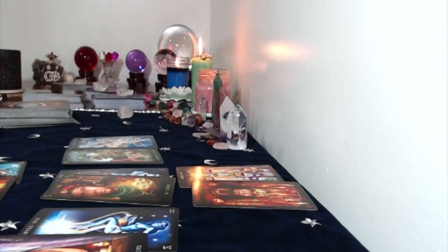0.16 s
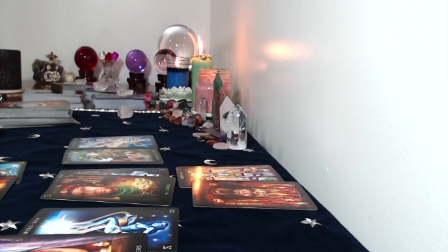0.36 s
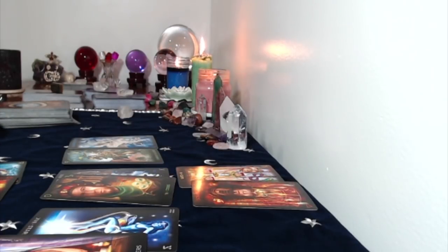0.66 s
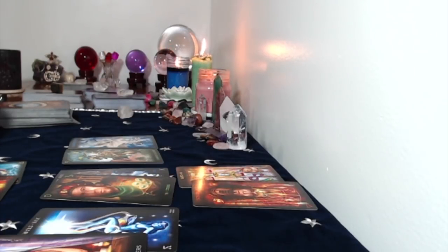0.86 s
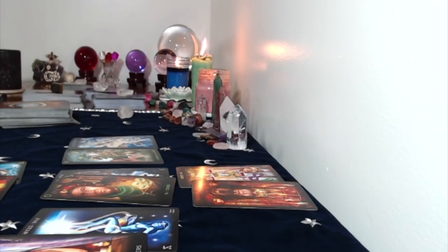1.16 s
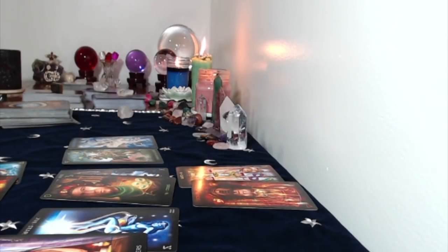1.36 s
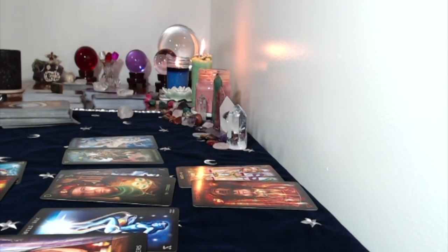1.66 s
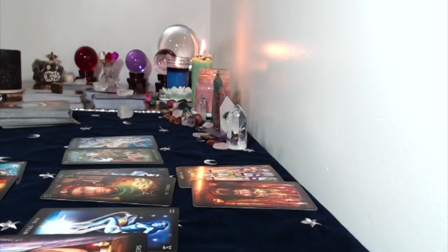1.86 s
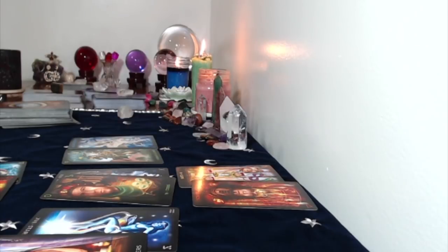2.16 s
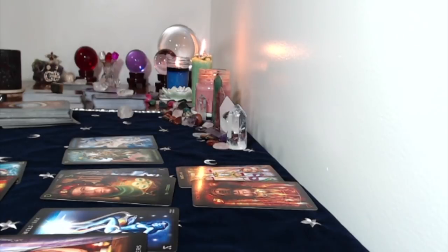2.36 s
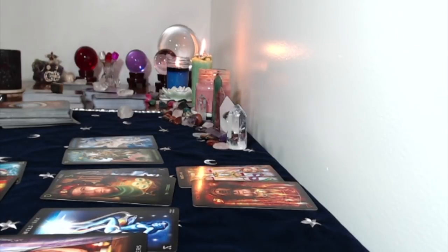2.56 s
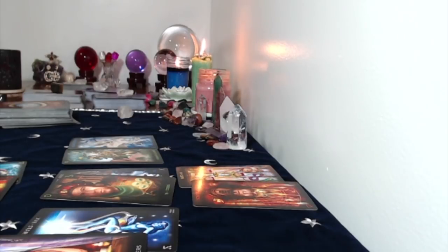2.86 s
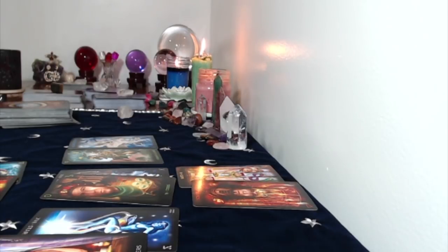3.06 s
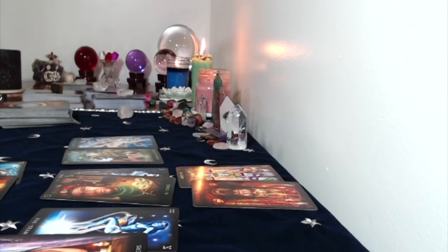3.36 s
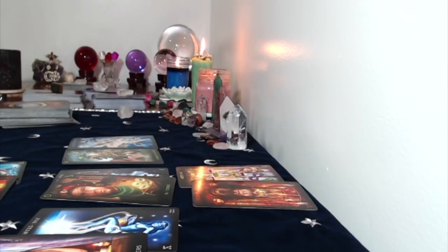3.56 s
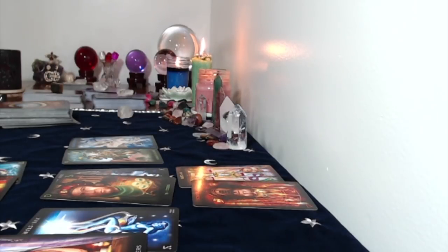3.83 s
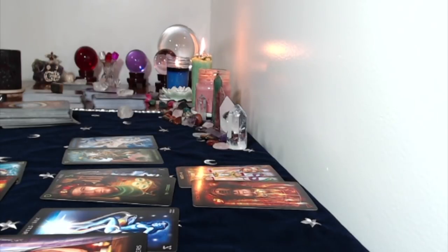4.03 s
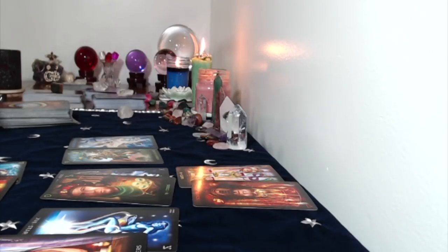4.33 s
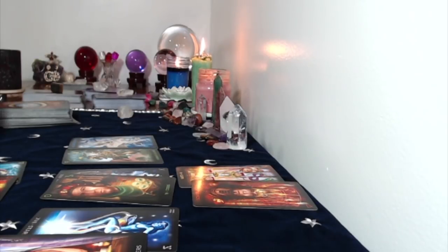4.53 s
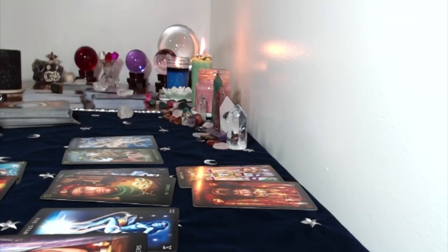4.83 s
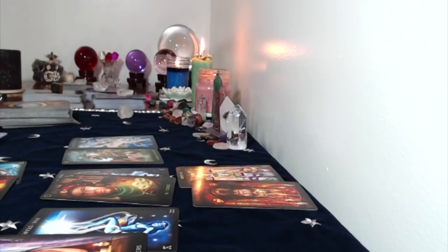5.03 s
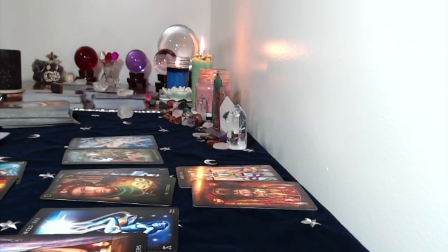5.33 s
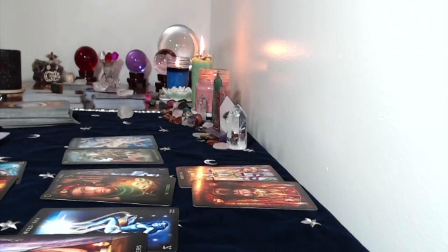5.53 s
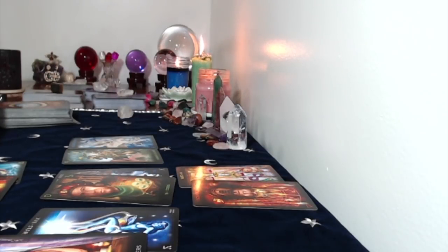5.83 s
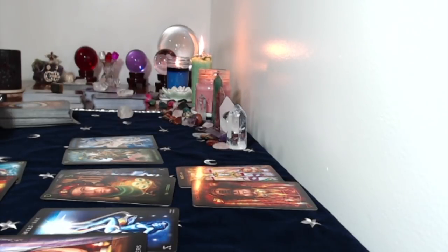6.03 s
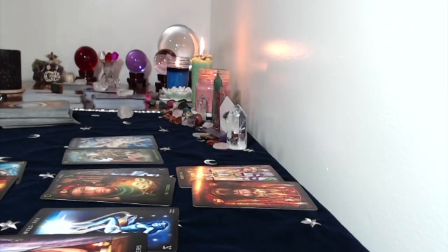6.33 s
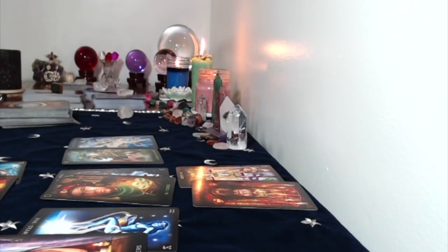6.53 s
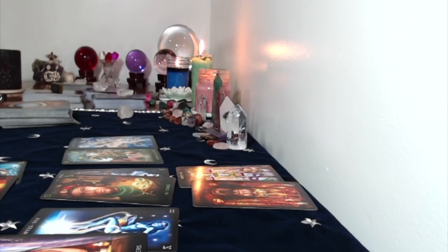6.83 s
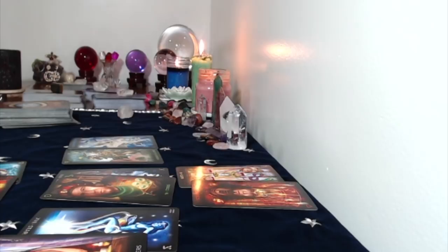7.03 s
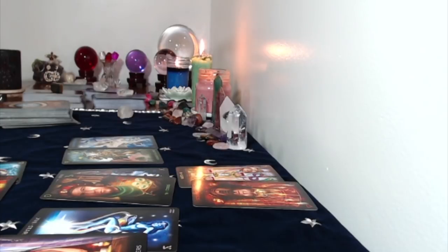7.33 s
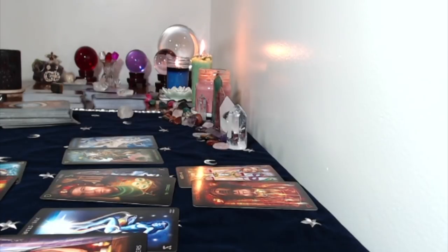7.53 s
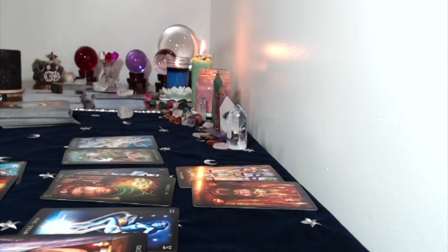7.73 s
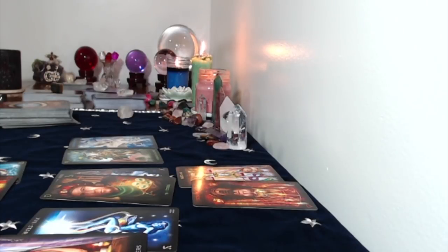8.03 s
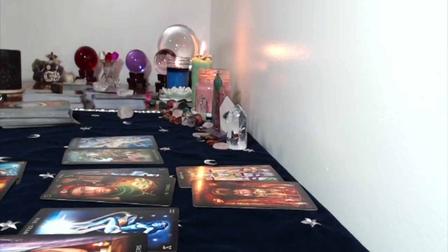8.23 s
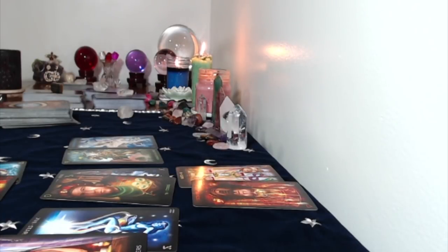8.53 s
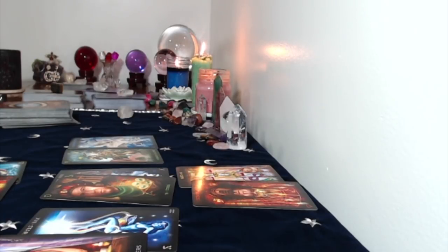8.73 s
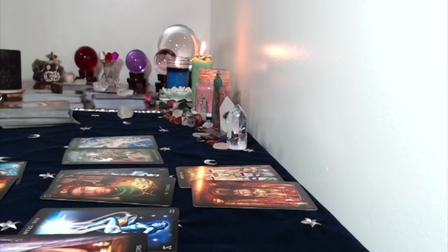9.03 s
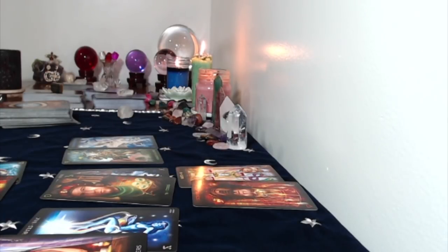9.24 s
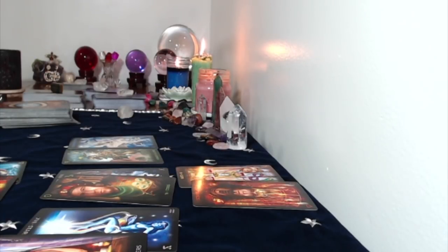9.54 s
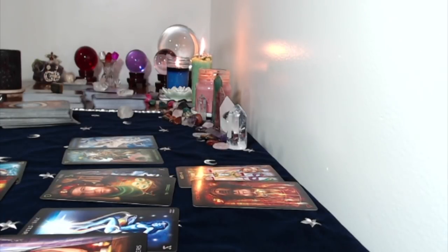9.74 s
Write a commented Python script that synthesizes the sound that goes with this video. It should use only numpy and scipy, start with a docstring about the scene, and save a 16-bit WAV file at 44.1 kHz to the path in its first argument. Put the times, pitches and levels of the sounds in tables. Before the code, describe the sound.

Four hollow knocks of a card deck on a table, with packets sliding and slapping and edges snapping over a faint hum.

```python
"""A deck of large cards is knocked square four times on a cloth-covered table in a small room.
In each knock a corner touches first, then the packets (small stacks of cards) land; table and room boom.
The hardest knock makes glass ornaments on the table ring faintly. Around the knocks, packets slide and
slap, card edges snap and hands bump the cloth. Mains hum and faint hiss lie under everything."""
import sys
import numpy as np
from scipy import signal
from scipy.fft import rfft, irfft
from scipy.io import wavfile

SR = 44100
rng = np.random.default_rng(int(sys.argv[2]) if len(sys.argv) > 2 else 0)


def bounce(signal):
    """Save signal as a 16-bit WAV file at the path given by the first command-line argument."""
    frames = np.transpose(np.atleast_2d(signal))
    limited = np.clip(frames, -1, 1)
    pcm = np.round(limited * 32767).astype(np.int16)
    wavfile.write(sys.argv[1], SR, pcm)


N = 436149
T = np.arange(N) / SR
FFT_SIZE = 4096
FREQS = np.maximum(np.arange(FFT_SIZE // 2 + 1) * SR / FFT_SIZE, 1)

# Levels compare rows within a table. A fade_s is the time a sound takes to drop by 60 dB.
# How long the room echoes: pitch_hz, fade_s
ROOM_FADES = [(100, 0.44), (500, 0.34), (1500, 0.35), (5000, 0.33), (9000, 0.37), (15000, 0.37)]
# Tone colour (how strong each pitch is) of the hiss and rumble: pitch_hz, level_db
AIR_COLOUR = [(20, -3.5), (40, -6.5), (90, -16.5), (170, -16.5), (350, -23), (415, -20), (450, -9),
              (510, -20.5), (650, -28), (1400, -25.5), (2200, -34), (5800, -33), (8500, -41.5),
              (15500, -45)]
# Two tones of mains hum and a faint whine: pitch_hz, level_db
HUM_TONES = [(59.6, -57), (119.5, -66.5), (3010, -85)]
# Packets drawn over each other: fastest_moment_s, length_s, level_db, brightness_db_per_octave
SLIDES = [(0.443, .18, -53.5, -0.5), (0.694, 0.092, -55.5, -2), (0.789, 0.066, -56.5, -2),
          (0.97, .1, -45.5, 3), (1.276, 0.2, -62, 2.5), (1.542, 0.44, -58, -3), (2.129, 0.52, -62, 1),
          (2.541, 0.057, -62.5, 4.5), (2.713, 0.12, -66.5, -3.5), (3.038, 0.18, -57, 1),
          (3.246, 0.24, -66, -6), (3.482, 0.26, -62.5, -1), (4.479, 0.084, -54, -3.5),
          (4.551, 0.078, -38, -0.5), (4.642, 0.18, -40, -1.5), (4.822, 0.17, -33.5, -3.5),
          (4.93, 0.15, -41.5, 6.5), (5.016, 0.12, -32, -2.5), (5.748, 0.34, -57.5, -2.5),
          (6.164, 0.11, -47.5, 1.5), (6.443, 1, -64, 1.5), (7.086, 0.18, -61.5, 0), (7.278, 0.21, -67.5, 0),
          (8.06, 0.32, -60.5, 0.5), (8.446, .19, -51, 3), (9.028, 0.52, -55.5, -2),
          (9.359, 0.23, -45, -2.5), (9.705, 0.83, -62.5, -5.5)]
# Tone colour of rubbing cards: pitch_hz, level_db
SLIDE_COLOUR = [(80, -5), (300, -3), (650, -7.5), (900, 0.5), (1150, -9.5), (1600, -1), (2400, -6),
                (3300, -8), (4700, -1.5), (6000, -0.5), (8000, -10), (11000, -18), (15500, -30.5)]
# Edges snapping and packets slapping: start_s, level_db, brightness_db_per_octave, length_s, pitch_hz
SNAPS = [(0.24, -53.5, -3.5, 0.02, 5300), (0.358, -45, -4, 0.018, 1400), (0.558, -51.5, 0.5, 0.0028, 8800),
         (0.633, -53, -3.5, 0.01, 1590), (0.908, -45.5, -2, .007, 1650), (1.826, -50.5, -2, 0.0016, 1690),
         (2.389, -41.5, -4, 0.025, 2620), (2.842, -57, -5.5, 0.0063, 4460),
         (3.397, -52.5, -6, 0.0081, 5460), (3.449, -52.5, 0, .007, 2200), (4.004, -14, -7, 0.0029, 1440),
         (4.489, -33.5, -4.5, 0.011, 5140), (4.497, -30, 1.5, 0.0079, 1430), (4.513, -25, -1, 0.0047, 6040),
         (4.729, -34.5, -6, .002, 5500), (4.771, -20, -6, 0.0058, 990), (4.778, -20.5, -0.5, 0.0033, 900),
         (4.803, -25, 3.5, .013, 1290), (4.869, -21.5, 0, .0015, 1260), (4.964, -26.5, 2.5, 0.0035, 5400),
         (5.033, -14.5, 2, 0.009, 990), (5.038, -16.5, -2.5, 0.0046, 4770), (5.046, -18.5, 2.5, .004, 6800),
         (5.505, -50, -1.5, 0.00087, 4600), (5.535, -42.5, -1.5, 0.01, 4200),
         (5.669, -49.5, -3.5, 0.0058, 2800), (5.759, -42.5, -.5, 0.0003, 5870),
         (5.977, -40.5, -1.5, 0.0054, 1890), (5.985, -35.5, -.5, .004, 1250),
         (6.107, -46, -1.5, 0.016, 3020), (6.528, -20.5, -10.5, 0.007, 3620),
         (6.874, -44.5, -5, .004, 2415), (6.883, -44.5, 3.5, 0.022, 1500),
         (6.948, -42.5, -2.5, 0.0016, 2600), (7.212, -56.5, -0.5, 0.0033, 1490),
         (7.382, -59.5, -1.5, 0.0037, 1987), (8.031, -48, -4.5, .014, 790),
         (8.112, -52.5, 11, 0.0023, 9830), (8.302, -46, 3, 0.021, 734), (8.365, -39.5, 4, 0.0037, 1640),
         (8.4, -39, 2.5, .004, 4030), (8.579, -34, -3, 0.016, 550), (8.601, -40.5, 2, 0.012, 1470),
         (8.649, -29, -0.5, 0.0024, 1980), (8.651, -27, 1, 0.00094, 3700), (8.924, -49.5, -3, .006, 3900),
         (9.055, -44.5, -10.5, 0.0059, 4560), (9.145, -45.5, 6.5, 0.008, 4160),
         (9.18, -39, -1.5, 0.018, 970), (9.257, -34.5, -3, 0.022, 1180), (9.362, -44.5, 8, .005, 3780),
         (9.576, -42, 3.5, 0.0047, 1350)]
# Tone colour of a snapping card: pitch_hz, level_db
SNAP_COLOUR = [(80, -11.5), (300, -9), (650, -4), (950, -2), (1250, -2.5), (1650, -1), (2500, -9),
               (3700, -7.5), (4700, -5), (6200, -9), (8000, -18), (11000, -25.5), (15500, -31)]
# Hands and cards bumping the cloth: start_s, level_db, treble_limit_hz, bass_boost_db
BUMPS = [(.195, -49, 430, 7), (3.084, -39, 270, 7.5), (3.205, -53.5, 252, -3), (4.330, -53, 220, 2),
         (4.518, -39.5, 600, -9), (4.610, -32, 504, 2.5), (5.440, -48, 417, 5.5), (5.561, -49, 338, 14),
         (8.367, -43.5, 650, 0), (8.58, -38.5, 650, -21), (9.142, -36, 554, 5), (9.299, -44.5, 600, -8),
         (9.394, -40.5, 704, 6), (9.633, -37, 740, 8), (9.83, -43.5, 450, 14)]
# Ringing tones of the glass ornaments: pitch_hz, level_db, fade_s
GLASS_TONES = [(3712, -9, .35), (4716, 0, .33), (4735, -2, .36), (6060, -5, .1), (6551, -8, .24)]
# Ringing tones of the table and the room, heard as the boom after each knock: pitch_hz, level_db, fade_s
BOOM_TONES = [(68, -2, .22), (109, -11, 0.15), (134.6, 0.5, 0.49), (164, -3, 0.19), (226.3, -0.5, 0.088),
              (268.4, 2, .3), (381, -2, 0.13), (397.2, 3, 0.11), (430, -9, 0.1), (493, -10.5, 0.35),
              (574, -4.5, 0.36), (657, 4, 0.27), (782, -5, 0.36), (972, 2.5, 0.35), (988, -5.5, 0.34),
              (1350, -4.5, 0.29), (1597, -10.5, 0.27), (1790, -6, 0.25)]
# Tone colour of a blow on the table: pitch_hz, level_db
BLOW_COLOUR = [(45, -25.5), (65, -2), (200, -4), (600, 2), (1150, -3.5), (1900, -2), (2400, -10),
               (4500, -15.5), (8000, -17), (15000, -22.5)]
# The deck knocked square: start_s, level_db, treble_limit_hz, bass_boost_db,
# corner_early_s, corner_relative_db, settle_s, last_packet_drop_db
KNOCKS = [(1.278, -14, 2400, -1.5, .006, -11, 0.078, 6), (2.001, -17, 1550, 5, .017, -2.5, 0.024, 21),
          (4.003, -10, 870, 3.5, .015, -13, .02, 24.5), (6.477, -14, 1840, -5, .006, -11, .055, 5)]


def gain(db):
    """Turn decibels into a number to multiply by."""
    return 10 ** (np.asarray(db) / 20)


def curve_at(points, hz):
    """Read between the points of a curve, with octaves evenly spaced."""
    pitches, values = np.transpose(points)
    return np.interp(np.log(hz), np.log(pitches), values)


def unit(x):
    """Scale a sound to an energy of one."""
    return x / np.sqrt(np.sum(x ** 2))


def add(track, start_s, x):
    """Mix x into the track at the given time."""
    i = max(int(start_s * SR), 0)
    track[i:i + len(x)] += x[:max(N - i, 0)]


def through(x, response):
    """Let every sample of x set off a copy of the response."""
    return signal.fftconvolve(x, response)[:N]


def click(colour_db):
    """A click with this tone colour; a sound passed through it takes on the colour."""
    # these steps pack the energy at the start of the click (a minimum-phase filter)
    cepstrum = irfft(np.log(gain(colour_db)))
    cepstrum[1:FFT_SIZE // 2] *= 2
    cepstrum[FFT_SIZE // 2 + 1:] = 0
    return unit(irfft(np.exp(rfft(cepstrum))))


def card_colour(points, brightness):
    """Brighten or dull a tone colour; a card is too small to give off deep bass."""
    bass_cut_db = 10 * np.log10(1 + (45 / FREQS) ** 4)
    return curve_at(points, FREQS) + brightness * np.log2(1 + FREQS / 900) - bass_cut_db


def grains(count, spread_db):
    """A dense stream of tiny clicks of uneven size."""
    sizes = gain(spread_db * np.minimum(rng.exponential(size=count), np.log(1000)))
    return unit(rng.standard_normal(count) * sizes) * np.sqrt(count)


def contact(length_s, scrape, spread_db):
    """A first click, then the other card edges arrive in a cluster that swells and fades."""
    age = T[:SR // 7] / length_s
    force = scrape * unit(grains(len(age), spread_db) * np.sqrt(age) * np.exp(-age))
    force[0] += 1
    return force


def ringing(tones):
    """Several tones ring together, each fading at its own pace."""
    t = T[:SR // 2]
    return unit(sum(gain(db - 60 * t / fade_s) * np.sin(2 * np.pi * hz * t) for hz, db, fade_s in tones))


def room(x, direct_db):
    """The direct sound plus its echoes; the hands move, so the echoes differ each time."""
    t = T[:16384]
    hz = np.maximum(np.fft.rfftfreq(len(t), 1 / SR), 1)
    noise = rfft(rng.standard_normal(len(t)))
    pitches, fades = np.transpose(ROOM_FADES)
    tail = np.zeros(len(t))
    for fade_s, one_band in zip(fades, np.eye(len(fades))):
        band = curve_at(np.c_[pitches, one_band], hz)
        tail += irfft(noise * band) * gain(-60 * t / fade_s)
    early_boost = 1 + 1.2 * np.exp(-t / 0.018)  # the near wall and the table answer first
    fade_in = 1 - np.exp(-t / 0.0017)
    response = unit(tail * early_boost * fade_in)
    response[0] += gain(direct_db)
    return signal.fftconvolve(x, unit(response))


def background():
    """Faint hiss and rumble, and a mains hum that wavers slowly."""
    air = through(rng.standard_normal(N), click(curve_at(AIR_COLOUR, FREQS)))
    waver_db = 1.5 * np.interp(T, np.linspace(0, T[-1], 16), rng.standard_normal(16))
    hum = sum(gain(db) * np.sin(2 * np.pi * hz * T) for hz, db in HUM_TONES)
    return gain(-61.5) * air + gain(waver_db) * hum


def slides(run_up, flicks_per_s=110, flick_s=0.0012, flick_depth=2.5):
    """Card faces rub: a grainy hiss that swells with speed and flares when an edge slips free."""
    out = np.zeros(N)
    slips = (rng.random(N) < flicks_per_s / SR) * rng.random(N)
    flare = 1 + flick_depth * through(slips, np.exp(-T[:SR // 20] / flick_s))
    friction = unit(grains(N, spread_db=5.5) * flare) * np.sqrt(N)
    for fastest_s, length_s, db, brightness in SLIDES:
        start_s = fastest_s - run_up * length_s
        end_s = start_s + length_s
        span = slice(max(int(start_s * SR), 0), int(end_s * SR))
        speed = np.interp(T[span], [start_s, fastest_s, end_s], [0, 1, 0])
        rub = through(friction[span] * speed ** 0.46, click(card_colour(SLIDE_COLOUR, brightness)))
        add(out, start_s, room(gain(db) * rub, direct_db=-4))
    return out


def edge_ticks(run_up, low_hz=1400, high_hz=5500, tick_s=0.0054, brightness=-1):
    """A stray edge catches once in each slide, louder in a firmer stroke. Gives rows like SNAPS."""
    rows = []
    for fastest_s, length_s, db, _ in SLIDES:
        start_s = fastest_s + length_s * (rng.random() - run_up)
        tick_db = db + rng.uniform(-1.5, -0.5)
        pitch_hz = low_hz * (high_hz / low_hz) ** rng.random()
        rows.append((start_s, tick_db, brightness, tick_s, pitch_hz))
    return rows


def snaps(rows, peak_db=9, width_octaves=0.2):
    """Card edges let go and slap the packet; each bent card favours a pitch of its own."""
    out = np.zeros(N)
    for start_s, db, brightness, length_s, pitch_hz in rows:
        boost_db = peak_db / (1 + (np.log2(FREQS / pitch_hz) / width_octaves) ** 2)
        colour = card_colour(SNAP_COLOUR, brightness) + boost_db
        snap = unit(through(contact(length_s, scrape=6.2, spread_db=4), click(colour)))
        add(out, start_s, room(gain(db) * snap, direct_db=-3.5))
    return out


def blows(rows, length_s, scrape, steepness):
    """The force of blows on the table, and their thuds: the softer the contact, the less treble."""
    force, thuds = np.zeros(N), np.zeros(N)
    for start_s, db, treble_hz, bass_db in rows:
        treble_cut_db = 10 * np.log10(1 + (FREQS / treble_hz) ** steepness)
        bass_lift_db = bass_db / (1 + (FREQS / 280) ** 2)
        push = click(curve_at(BLOW_COLOUR, FREQS) - treble_cut_db + bass_lift_db)
        add(force, start_s, gain(db) * push)  # the table feels a packet as one lump
        patter = unit(through(contact(length_s, scrape, spread_db=2), push))
        add(thuds, start_s, room(gain(db) * patter, direct_db=-8.5))
    return force, thuds


def bumps(settle_s=0.028, lighter_db=8):
    """A hand or card bumps the cloth, then comes to rest with a second, lighter bump."""
    settling = [(start_s + settle_s, db - lighter_db, treble_hz, bass_db)
                for start_s, db, treble_hz, bass_db in BUMPS]
    return blows(BUMPS + settling, length_s=0.0067, scrape=4, steepness=5.5)


def glass_clink(start_s, level_db):
    """The shaken glass ornaments ring once, with a quieter echo from the room."""
    out = np.zeros(N)
    ring = ringing(GLASS_TONES)
    add(out, start_s, gain(level_db) * ring)
    add(out, start_s, gain(level_db - 8) * unit(room(ring, direct_db=-22)))
    return out


def boom(force):
    """Every push sets the table and the room ringing."""
    return through(force, ringing(BOOM_TONES))


def knocks(packets=5, jitter=0.4):
    """A corner of the deck touches first, then the packets land one after another, ever lighter."""
    rows = []
    for start_s, db, treble_hz, bass_db, early_s, corner_db, settle_s, drop_db in KNOCKS:
        rows.append((start_s - early_s, db + corner_db, treble_hz, bass_db))
        nudges = jitter * rng.uniform(-1, 1, packets)  # shares of the gap between packets
        nudges[0] = 0
        for progress in (np.arange(packets) + nudges) / (packets - 1):
            rows.append((start_s + settle_s * progress, db - drop_db * progress, treble_hz, bass_db))
    return blows(rows, length_s=0.0027, scrape=1.5, steepness=4.68)


def scene():
    """Mix the cards, the boom, the glass and the background into one channel."""
    run_up = 0.63  # share of a slide spent gathering speed
    knock_force, knock_thuds = knocks()
    bump_force, bump_thuds = bumps()
    booming = gain(-17.5) * boom(knock_force + bump_force)
    glass = glass_clink(start_s=4.005, level_db=-33)  # timed to the hardest knock
    snapping = snaps(SNAPS + edge_ticks(run_up))
    hits = gain(-2.5) * knock_thuds + gain(0.5) * bump_thuds + booming + glass + snapping
    hit_gain = np.sqrt(SR * 0.025)  # a hit's level counts its energy as spread over 25 ms
    rubbing = gain(4) * slides(run_up)
    return (hit_gain * hits + rubbing + background())[None]


def record(dry):
    """A nearby desk microphone softens the top treble, flattens loud peaks and cuts off steeply."""
    soften_hz, ceiling, cutoff_hz = 14500, 0.56, 15900
    soft = signal.sosfilt(signal.butter(4, soften_hz, fs=SR, output="sos"), dry)
    rounded = soft / (1 + (soft / ceiling) ** 6) ** (1 / 6)
    return signal.sosfilt(signal.ellip(10, 0.2, 80, cutoff_hz, fs=SR, output="sos"), rounded)


dry = scene()
out = record(dry)
bounce(out)
```